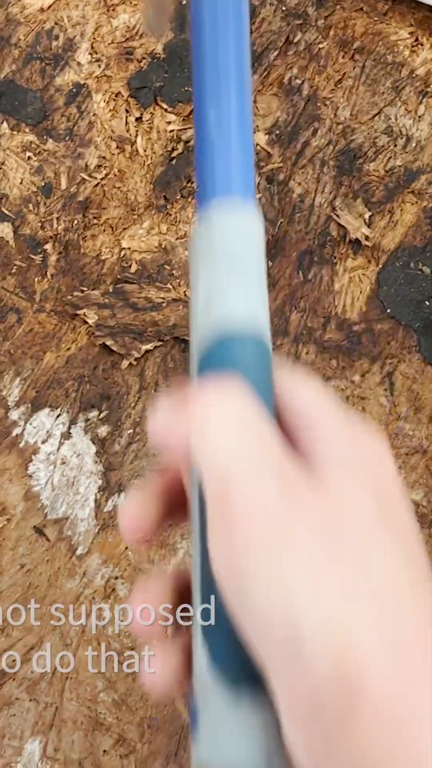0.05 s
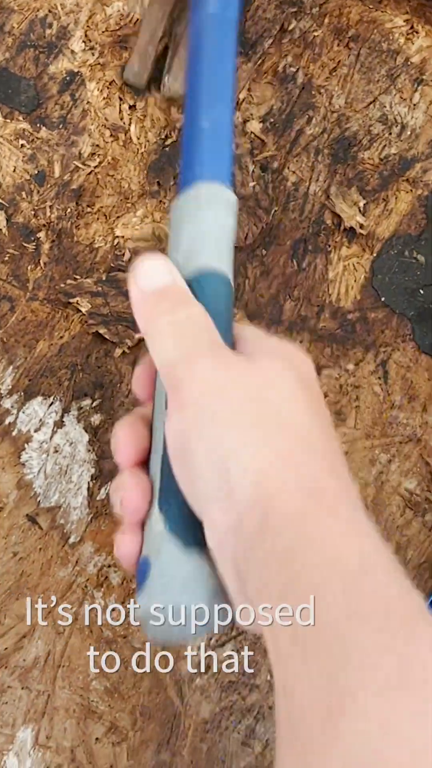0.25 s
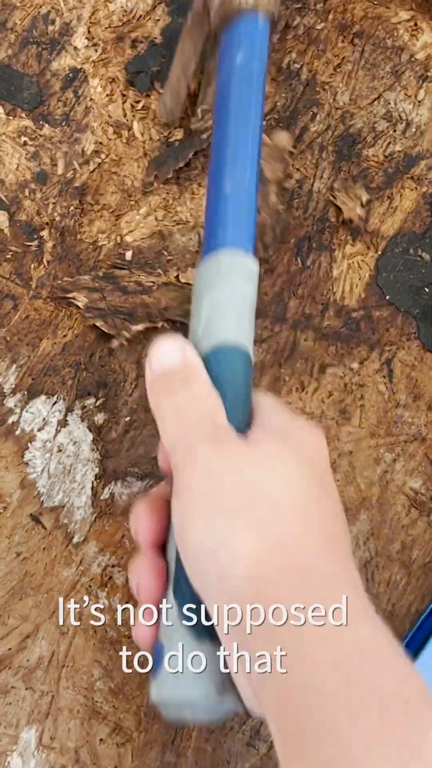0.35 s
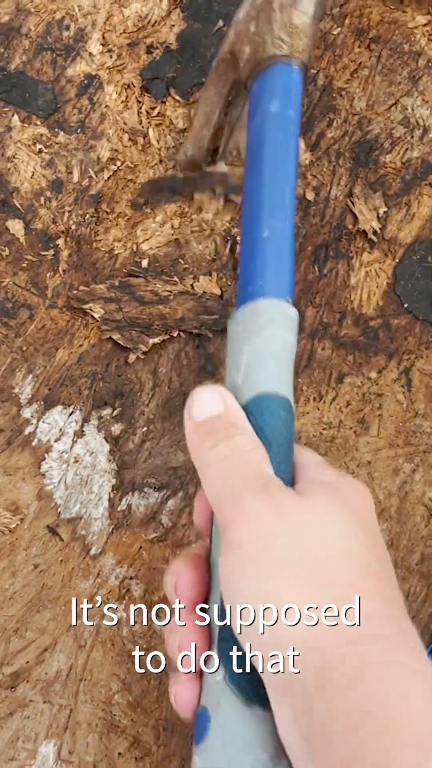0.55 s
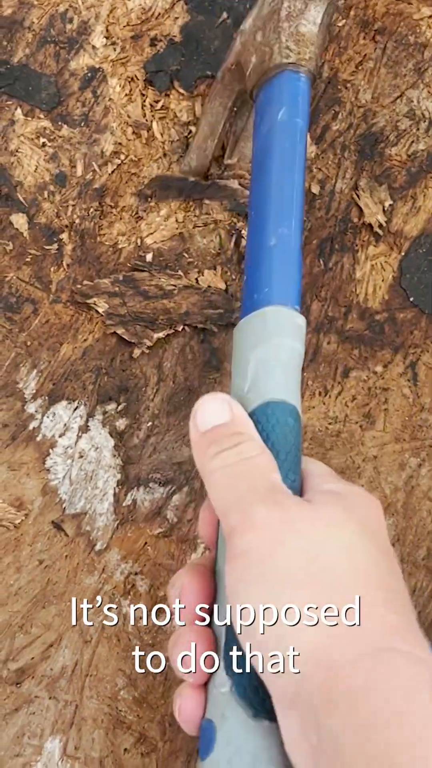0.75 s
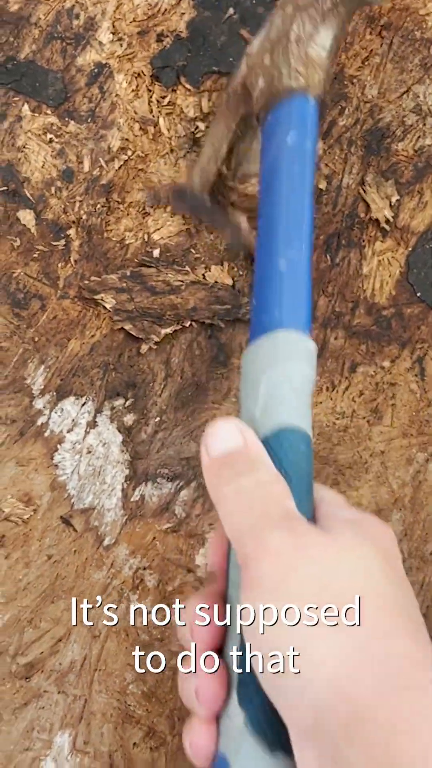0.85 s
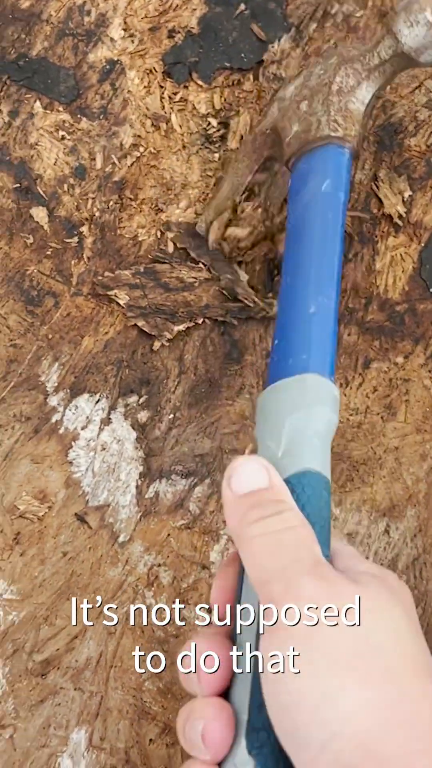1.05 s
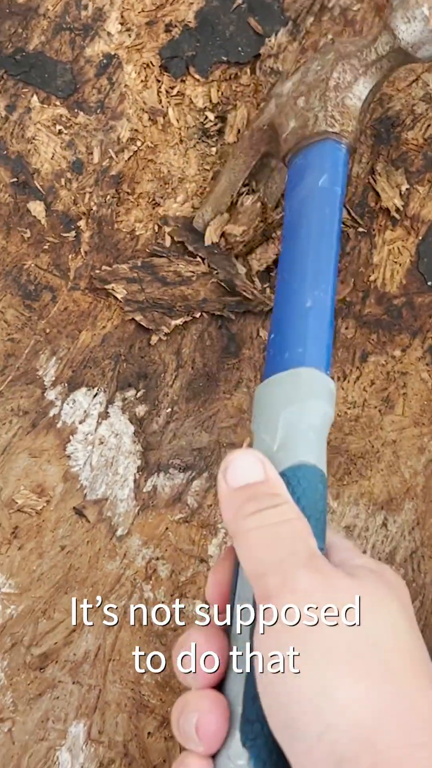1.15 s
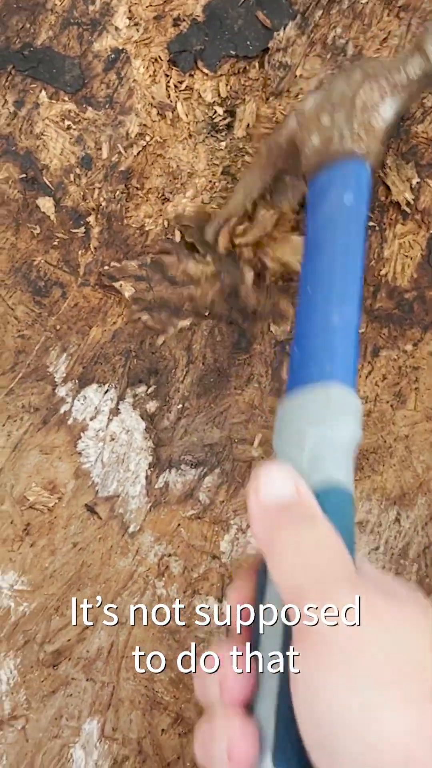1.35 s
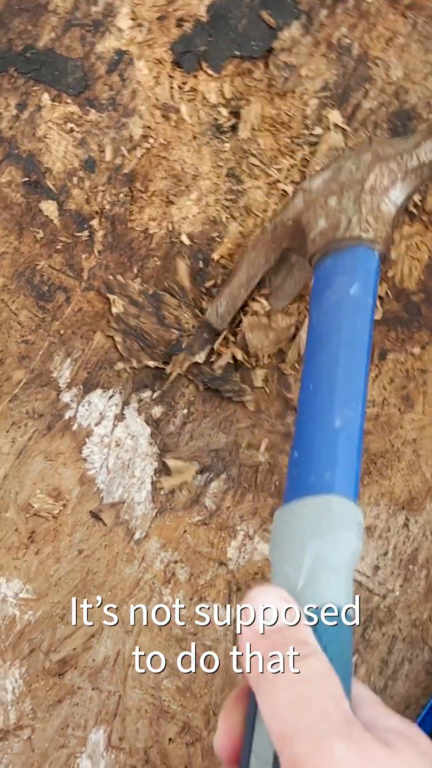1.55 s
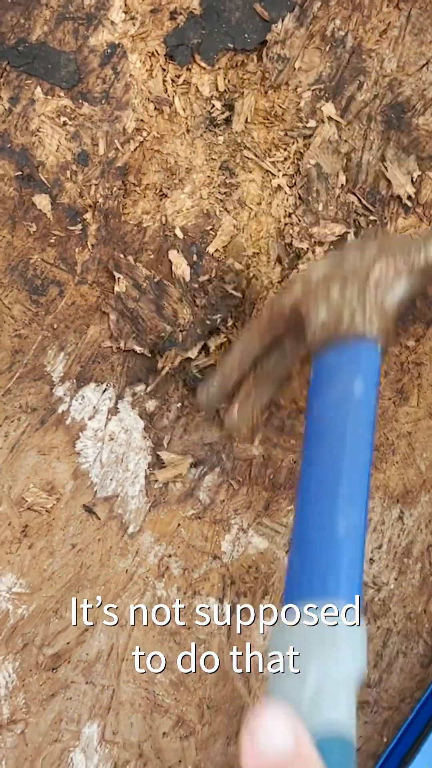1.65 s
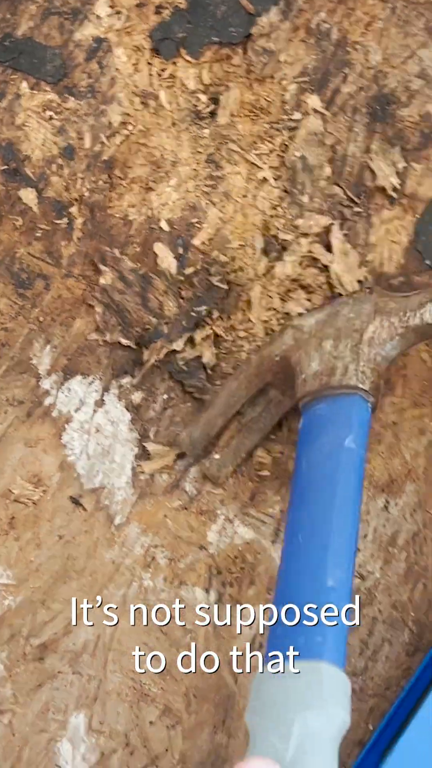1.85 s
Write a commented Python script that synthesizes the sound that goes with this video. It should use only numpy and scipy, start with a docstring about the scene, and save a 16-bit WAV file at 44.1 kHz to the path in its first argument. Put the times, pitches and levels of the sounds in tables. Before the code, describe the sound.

A claw hammer bites into a rotten board with a hollow boom, then drags through it in three juddering pulls. Soft fibres crumble and splinters snap close to the microphone, in a bare, echoing room.

```python
"""Claw hammer in rotten wood

A claw hammer bites into a rotten board, which booms, and is dragged through it in three pulls.
The claw sticks and slips, shaking the board, while soft fibres crumble and larger splinters snap.
A bare room echoes over a low rumble; the two microphone openings are close by."""
import sys
import numpy as np
from scipy import signal
from scipy.fft import rfft, irfft, next_fast_len
from scipy.io import wavfile
from scipy.ndimage import uniform_filter1d, minimum_filter1d, map_coordinates

SR = 44100
rng = np.random.default_rng(int(sys.argv[2]) if len(sys.argv) > 2 else 0)


def pcm_store(signal):
    """Save signal as 16-bit PCM."""
    levels = np.round(np.clip(np.atleast_2d(signal), -1, 1) * 32767)
    wavfile.write(sys.argv[1], SR, levels.astype(np.int16).T)


N = 83790
TIME = np.arange(N) / SR


def amp(db):
    """Decibels to gain."""
    return 10 ** (np.asarray(db) / 20)


def unit(x):
    """Scale x to an average power of 1."""
    return x / np.sqrt(np.mean(x ** 2) + 1e-20)


def along(points, hz):
    """Read between (f/Hz, value) points, with octaves evenly spaced."""
    f, v = np.transpose(points)
    return np.interp(np.log(hz + 1), np.log(f + 1), v)


def curves(rows):
    """One value per sample for each column after the time."""
    times, *columns = np.transpose(rows)
    return [np.interp(TIME, times, column) for column in columns]


def wobble(per_s):
    """A smooth curve through per_s random values a second."""
    return map_coordinates(rng.standard_normal(N // 10), [TIME * per_s], mode="mirror")


def filtered(x, response):
    """Scale each frequency in x by response(hz)."""
    n = x.shape[-1]
    m = next_fast_len(n + SR // 4)
    return irfft(rfft(x, m) * response(np.fft.rfftfreq(m, 1 / SR)), m)[..., :n]


def coloured(x, spectrum, size=4096):
    """Shape x by (f/Hz, level/dB) points without smearing it back in time."""
    cepstrum = irfft(np.log(amp(along(spectrum, np.fft.rfftfreq(size, 1 / SR)))))
    cepstrum[1:size // 2] *= 2
    cepstrum[size // 2 + 1:] = 0
    return signal.fftconvolve(x, irfft(np.exp(rfft(cepstrum))))[:len(x)]


def noise(spectrum):
    """Noise of power 1, shaped by (f/Hz, level/dB) points."""
    return unit(filtered(rng.standard_normal(N), lambda hz: amp(along(spectrum, hz))))


def fade(t, t60):
    """Die away by 60 dB in t60 seconds, the fade time."""
    return np.exp(-np.log(1000) * t / np.maximum(t60, 1e-4))


def swell(at_s, width_s):
    """A bell-shaped rise and fall."""
    return np.exp(-.5 * ((TIME - at_s) / width_s) ** 2)


def ring(tones, t):
    """A sum of dying tones."""
    return sum(amp(db) * fade(t, t60) * np.sin(2 * np.pi * hz * t) for hz, db, t60 in tones)


def steady(x, size):
    """Hold x near power 1 over stretches of size samples."""
    power = uniform_filter1d(uniform_filter1d(x ** 2, size), size)
    return x / np.sqrt(np.abs(power) + np.mean(x ** 2) / 1000)


# tone of the background (f/Hz, level/dB)
RUMBLE_TONE = [(25, -10.5), (50, 3.5), (85, 7.5), (170, -26), (300, -31), (600, -51.5), (2000, -44.5),
               (15000, -50)]
def rumble():
    """A low background that swells and sinks."""
    return amp(-42 + 3.5 * wobble(per_s=9.3)) * noise(RUMBLE_TONE)


# when the swing rustles (t/s)
RUSTLE_TIMES = [0.039, 0.176]
# tone of the rustles and of the crumbling fibres (f/Hz, level/dB)
FIBRE_TONE = [(300, 4), (800, -9.5), (1400, -2.5), (2400, -4), (3300, -6), (4350, 0), (5500, -6),
              (8500, -0.5), (10500, -9.5), (12800, -3), (15500, -8)]
def swing():
    """Faint rustling as the hammer comes down."""
    return amp(-63.5) * noise(FIBRE_TONE) * sum(swell(s, width_s=0.023) for s in RUSTLE_TIMES)


# a faint tick before the blow, then splinters that crack
# (t/s, relative level/dB, f/Hz, treble/dB, fade time/s)
TICK_AND_SNAPS = [(0.128, -48, 8000, 4, 0.026), (0.279, -19.5, 1200, -4, 0.031),
                  (0.4691, -21, 8200, 22, 0.009), (0.495, -20.5, 8200, -2, 0.012),
                  (0.5044, -17, 8200, -2, 0.011), (0.5162, -14, 3250, 0.5, 0.015),
                  (0.5535, -19.5, 13000, 6, 0.036), (0.58, -20.5, 12800, 11, 0.025),
                  (0.645, -25, 7500, 12, 0.0094), (0.7426, -24.5, 2900, -5, 0.012),
                  (0.83, -7.5, 1590, -9.5, 0.015), (0.8728, -10.5, 2500, -8, 0.0081),
                  (0.904, -5.5, 3900, -3.5, 0.014), (0.925, -19.5, 4500, 11, 0.018),
                  (1.025, -25, 13000, 6, 0.05), (1.0361, -19, 4150, 1.5, 0.027),
                  (1.052, -16, 2600, -13, 0.016), (1.1276, -28.5, 13000, 18, 0.018),
                  (1.2344, -33, 8200, 8.5, 0.02), (1.249, -28.5, 1700, 2.5, 0.036),
                  (1.2623, -15.5, 1400, -7, 0.0095), (1.2953, -14, 4000, -1, 0.012),
                  (1.3147, -15, 2840, -5, 0.033), (1.3305, -17, 3500, -6, 0.0093),
                  (1.3536, -9.5, 2700, -11, 0.0093), (1.3634, -13.5, 2389, -8, 0.027),
                  (1.396, -17, 1350, 2.5, 0.025), (1.4272, -12, 3500, 1, 0.031),
                  (1.461, -23, 2300, -4, 0.015)]
def tick_and_snaps(attack_s=0.0012, ring_db=8.5):
    """A faint tick before the blow, then splinters tear; each sound rings briefly at its own pitch."""
    out, t = np.zeros(N + SR), TIME[:SR // 10]
    onset = np.minimum(t / attack_s, 1) ** 2
    for s, db, hz, treble_db, t60 in TICK_AND_SNAPS:
        colour = [(300, -14.5), (900, -13.5), (1500, -6.5), (4300, -1),
                  (5400, treble_db - 4.5), (8500, treble_db), (15000, treble_db - 6.5)]
        burst = rng.standard_normal(len(t)) * onset * fade(np.maximum(t - attack_s, 0), t60)
        ringing = signal.lfilter(*signal.iirpeak(hz, Q=4, fs=SR), burst)
        click = unit(coloured(burst, colour) + amp(ring_db) * ringing)
        out[int(s * SR):][:len(t)] += amp(db - 9) * click * np.sqrt(np.mean(fade(t, t60) ** 2))
    return out[:N]


# the steel head's own tones (f/Hz, level/dB, fade time/s)
STEEL_TONES = [(2200, -1, .12), (2540, -1, .08), (3190, -4, .08), (4010, -2, .07), (4580, -4, .07),
               (6510, -5, .08)]
def hammer_ring(breaking):
    """The breaking wood makes the steel ring faintly."""
    steel = ring(STEEL_TONES, TIME[:SR // 4])
    return amp(-21) * signal.fftconvolve(breaking, steel / np.linalg.norm(steel))[:N]


# how strongly the fibres crumble (t/s, level/dB, treble/dB)
CRUMBLING = [(.225, -88, -26), (.245, -40, -18), (.265, -76, -11), (.282, -37.5, -3.5), (.35, -39.5, -3),
             (.44, -48, -0.5), (.5, -47.5, 3.5), (.58, -40, -0.5), (.62, -46.5, 2), (.71, -58.5, -39),
             (.77, -44, 2), (.822, -35.5, -1.5), (.85, -32, 0.5), (.92, -35, 0.5), (.96, -39.5, -5),
             (1.055, -42.5, 1), (1.1, -51.5, -6), (1.22, -60.5, -13), (1.285, -42.5, 0.5), (1.325, -31, -3),
             (1.365, -30, 2.5), (1.41, -35, -0.5), (1.47, -40.5, 0.5), (1.56, -45.5, -5), (1.66, -46, -4.5),
             (1.75, -66, -31), (1.9, -70, 0)]
# tone of the thick fibres (f/Hz, level/dB)
THICK_TONE = [(1000, -38), (1450, -2), (1900, -11.5), (2250, 0), (2650, 0.5), (3400, -11.5), (5000, -16.5)]
def crumble(sizes=10, breaks_per_s=3500):
    """Clumps of tiny breaks in fibres of several sizes; harder pulls break thicker ones."""
    level_db, treble_db = curves(CRUMBLING)
    t, grains = TIME[:SR // 100], np.zeros(N)
    for _ in range(sizes):
        happens = rng.random(N) < breaks_per_s / sizes / SR
        breaks = happens * amp(3.5 * np.clip(rng.standard_normal(N), -2, 2))
        grain = unit(rng.standard_normal(len(t)) * fade(t, t60=0.0031))
        colour = [(hz, db + 3.5 * rng.standard_normal()) for hz, db in FIBRE_TONE]
        grains += coloured(signal.fftconvolve(breaks - breaks.mean(), grain)[:N], colour)
    clumps = amp(1.8 * wobble(per_s=130))
    grains = steady(grains * clumps, size=1200)
    treble = filtered(grains, lambda hz: along([(4500, 0.11), (9000, 1)], hz))
    thick = filtered(grains, lambda hz: amp(along(THICK_TONE, hz)))
    thick *= amp(2.5 + 0.86 * (level_db - level_db.max()))
    return amp(level_db) * (grains + thick + (amp(treble_db) - 1) * treble)


# tone of the claw sinking in (f/Hz, level/dB)
BITE_TONE = [(150, -0.5), (480, 2), (867, -17), (1220, -8.5), (5040, -22), (8040, -16.5), (10100, -28.5),
             (12000, -15.5), (15500, -28)]
def bite():
    """The claw crushes its way into the soft surface."""
    return amp(-19.5) * noise(BITE_TONE) * swell(at_s=0.2362, width_s=0.003)


BOOM_S = 0.2395  # the board takes the blow
# the board's own low tones (f/Hz, level/dB, fade time/s)
BOARD_TONES = [(55.03, 3.5, 0.96), (71.14, -7, 0.99), (89.4, 7.5, 0.48), (106.4, -29, 0.12),
               (128.1, -5, 0.28), (154, -17, 0.64), (189, 0.5, 0.037), (269, -22, 0.21), (311, -30.5, 0.75),
               (344, -23, 0.9), (439, -29, 0.39)]
# the dull punch of the blow (f/Hz, level/dB)
THUD_TONE = [(60, -5.5), (120, 15.5), (190, 0), (300, -3), (500, -4.5), (750, -10.5), (1200, -17.5),
             (2500, -59)]
# the blur of the board's many weak higher tones (f/Hz, level/dB)
SHUDDER_TONE = [(100, 16), (200, 3.5), (400, -4.5), (700, -12), (1200, -3.5), (2200, -24.5), (5000, -77)]
def boom(wavers_per_s=20.33, attack_s=0.0014):
    """The struck board thuds, shudders and rings; the claw stuck in it makes the ring waver."""
    t = np.maximum(TIME - BOOM_S, 0)
    waver_rad = 0.64 * (1 - np.exp(-t * wavers_per_s))
    tones = sum(amp(db) * fade(t, t60) * np.sin(2 * np.pi * hz * t + waver_rad * wobble(wavers_per_s))
                for hz, db, t60 in BOARD_TONES)
    thud = amp(-12.5) * steady(noise(THUD_TONE), size=400) * fade(t, t60=0.04)
    shudder = amp(-26) * noise(SHUDDER_TONE) * fade(t, t60=1.0)
    return (amp(-7.5) * tones + thud + shudder) * (1 - np.exp(-t / attack_s))


# the three pulls (t/s, level/dB, slip rate/Hz)
PULLS = [(.3, -45, 103), (.42, -24.5, 122.6), (.5, -26, 85.7), (.58, -19.5, 115), (.635, -24.5, 60.2),
         (.70, -35.5, 60.8), (.765, -37, 58.3), (.805, -21.5, 126), (.86, -18, 110.3), (.94, -23.5, 95.4),
         (1.0, -34.5, 105), (1.06, -30.5, 91.8), (1.13, -41.5, 85.7), (1.21, -61, 88.2), (1.275, -43, 113),
         (1.30, -21.5, 110), (1.314, -35, 127.7), (1.365, -18, 118), (1.41, -17.5, 105), (1.465, -10.5, 88),
         (1.508, -7, 99), (1.528, -30.5, 88.6), (1.56, -9.5, 105), (1.605, -21.5, 120.3), (1.64, -10, 145),
         (1.675, -11.5, 130.5), (1.70, -20, 116), (1.78, -31.5, 128), (1.9, -48, 93)]
# the soft push of one slip (f/Hz, level/dB)
SLIP_TONE = [(25, -27), (55, 5), (90, 1.5), (140, 7.5), (220, -1.5), (340, 6), (450, -2.5), (650, -20.5),
             (2000, -42)]
# the claw rubbing on wood (f/Hz, level/dB)
RUB_TONE = [(120, -14), (250, -16), (350, 4), (520, -7.5), (750, -15), (1300, -13.5), (2500, -34.5)]
def drag(scatter_cycles=0.18, spread_db=1.5, rocking_share=0.29):
    """Each slip of the claw rocks and rings the board; dull rubbing grows with the pull."""
    level_db, rate = curves(PULLS)
    cycles = np.cumsum(rate) / SR
    timing, strength = rng.standard_normal((N // 100, 2))[:int(cycles[-1])].T
    at = np.searchsorted(cycles, np.arange(len(timing)) + scatter_cycles * timing)
    slips = np.bincount(at, amp(spread_db * strength), N)[:N]
    pushes = coloured(slips - slips.mean(), SLIP_TONE)
    pressed = [(hz, db, t60 * 0.34) for hz, db, t60 in BOARD_TONES]  # the claw shortens the ring
    shake = signal.fftconvolve(pushes, ring(pressed, TIME[:SR // 2]))[:N]
    # slower slips ring the tones above 245 Hz less
    upper = filtered(shake, lambda hz: 1 / (1 + (245 / (hz + 1)) ** 8))
    shake += (amp(12.5 * np.log2(rate / rate.max())) - 1) * upper
    # over 126 slips a second, the tones below 74 Hz drop out
    deep = filtered(shake, lambda hz: 1 / (1 + (hz / 74) ** 10))
    shake -= deep / (1 + (126 / rate) ** 10)
    rocking = np.sqrt(2) * np.sin(2 * np.pi * cycles + wobble(per_s=45))
    motion = np.sqrt(1 - rocking_share) * steady(shake, size=900) + np.sqrt(rocking_share) * rocking
    rubbing = amp(-37 + 0.46 * level_db) * noise(RUB_TONE)
    return (TIME > BOOM_S) * (amp(level_db) * steady(motion, size=900) + rubbing)


def near_echoes(x):
    """The nearby board and hand scatter the cracks differently to left and right."""
    t = TIME[:SR // 20]
    tail = rng.standard_normal((2, len(t))) * fade(t, t60=0.039)
    return amp(-7.5) * signal.fftconvolve(x[None], tail / np.linalg.norm(tail[0]), axes=1)[:, :N]


# how long the room rings (f/Hz, fade time/s)
ROOM_FADE = [(100, 0.12), (400, 0.56), (1500, 0.97), (4400, 0.94), (8000, 0.74), (15000, 0.36)]
# how loud its echo is (f/Hz, level/dB)
ROOM_TONE = [(100, -22.5), (400, 7), (1500, -3), (4500, -2), (8000, -6.5), (15000, -16)]
# how alike left and right are (f/Hz, likeness from 0 to 1)
ROOM_LIKENESS = [(200, 1), (700, 0.25), (2500, 0.05), (8000, 0.22), (10000, 1), (13500, 1), (16000, .6)]
def room(x):
    """Echoes from the bare room blur into a fading tail."""
    hz, t, bands = signal.stft(rng.standard_normal((2, SR)), SR, nperseg=256)
    t60 = along(ROOM_FADE, hz)[:, None]
    bands = bands * fade(t, t60) * np.sqrt(2 * np.log(1000) / (t60 * SR))
    width = np.arccos(along(ROOM_LIKENESS, hz)) / 2
    gain = amp(along(ROOM_TONE, hz)) * np.array([np.cos(width), np.sin(width)])
    mid, side = signal.istft(bands * gain[:, :, None], SR, nperseg=256)[1]
    tail = np.pad([mid + side, mid - side], ((0, 0), (SR // 200, 0)))  # arrives 5 ms late
    return signal.fftconvolve(x[None], tail, axes=1)[:, :N]


def scene():
    """The swing, a tick, the breaking wood, the shaking board, their echoes and the rumble."""
    breaking = bite() + crumble() + tick_and_snaps()
    breaking += hammer_ring(breaking)
    board = boom() + drag()
    return swing() + breaking + board + near_echoes(breaking) + room(breaking + 0.55 * board) + rumble()


# how much louder the left opening is than the right (f/Hz, level/dB)
LEFT_LOUDER = [(60, 1), (250, 3), (600, -0.6), (1400, 3), (2600, 5.5), (4200, 7), (5600, 9), (7500, 2),
               (9500, -5.5), (15000, 2)]
# how far the left wave runs ahead (f/Hz, phase/rad)
LEFT_AHEAD = [(400, 0), (800, .7), (1500, -.3), (2800, .5), (4500, .6), (7000, 0), (8400, -1.2),
              (9800, -3.1), (10400, -3.2), (11500, -4.6), (12600, -6.2), (14400, -6.4), (16000, -7.3)]
def record(dry, low_hz=35.5, top_hz=15800, ceiling=0.95, hold_s=0.0045):
    """Two openings pick up the sound; the deepest bass, loudest peaks and highest treble are cut."""
    half = np.array([[.5], [-.5]])
    x = filtered(dry, lambda hz: amp(half * along(LEFT_LOUDER, hz))
                 * np.exp(1j * half * along(LEFT_AHEAD, hz)))
    x = signal.sosfilt(signal.butter(2, low_hz, "high", fs=SR, output="sos"), x)
    hold = int(hold_s * SR)
    needed = np.minimum(1, ceiling / (np.abs(x).max(0) + 1e-9))
    gain = uniform_filter1d(minimum_filter1d(needed, 2 * hold), hold)
    return filtered(x * gain, lambda hz: hz < top_hz)


dry = scene()
out = record(dry)
pcm_store(out)
```